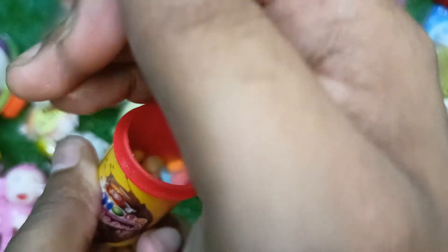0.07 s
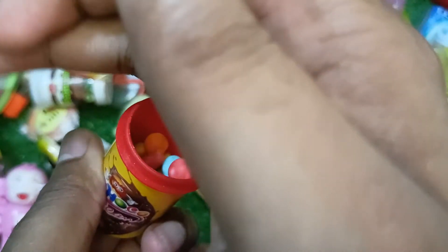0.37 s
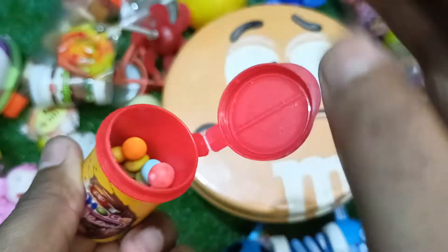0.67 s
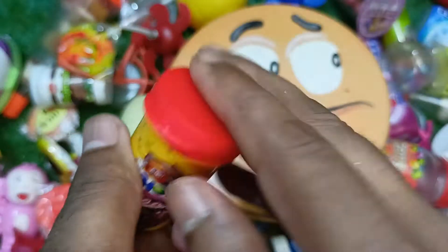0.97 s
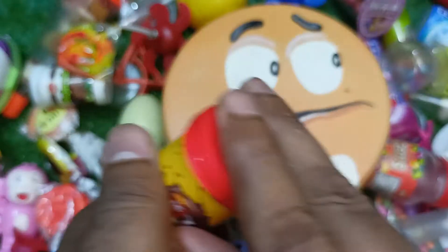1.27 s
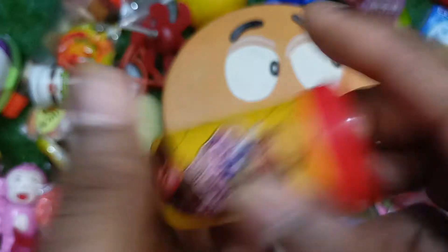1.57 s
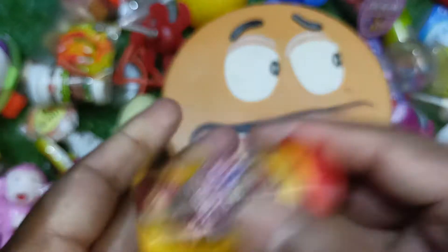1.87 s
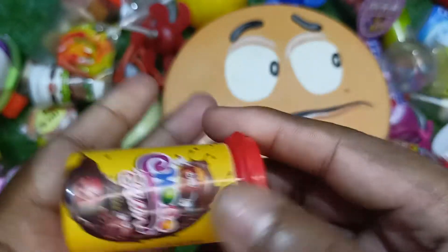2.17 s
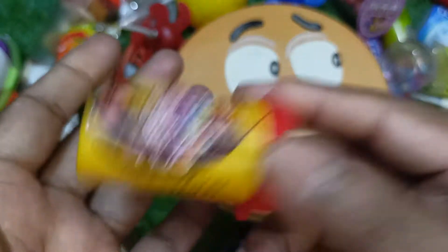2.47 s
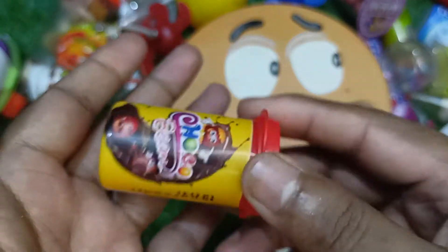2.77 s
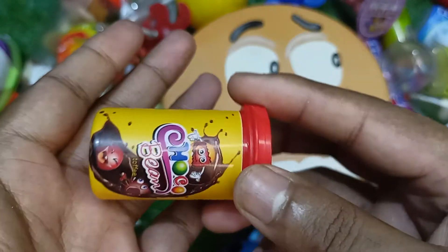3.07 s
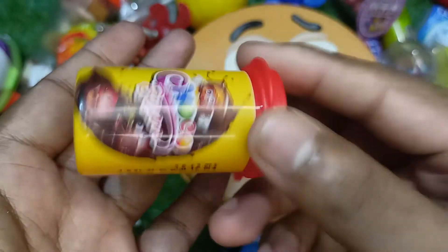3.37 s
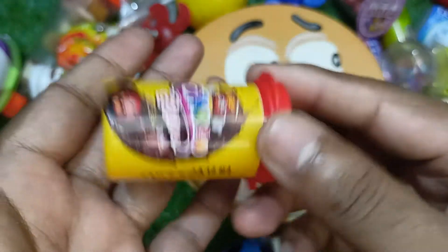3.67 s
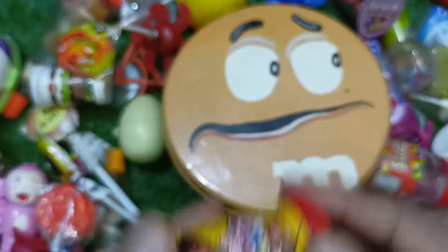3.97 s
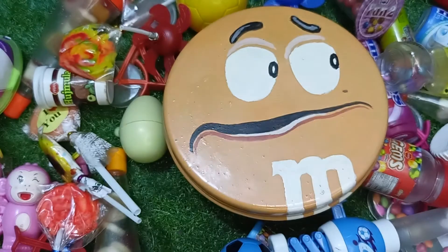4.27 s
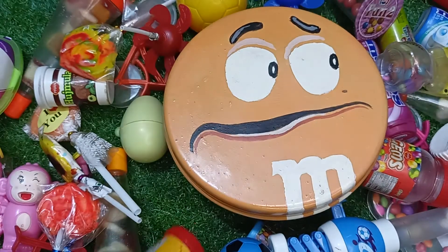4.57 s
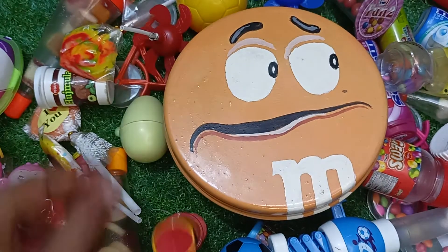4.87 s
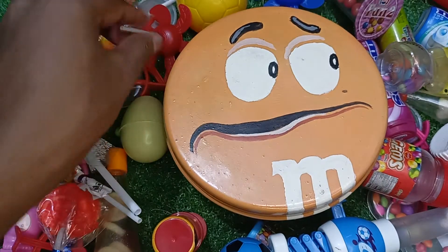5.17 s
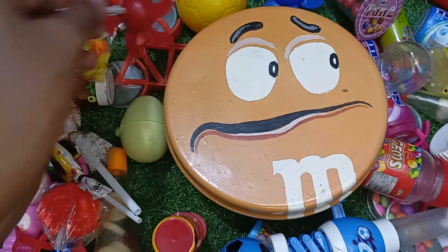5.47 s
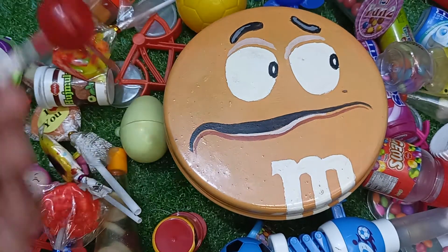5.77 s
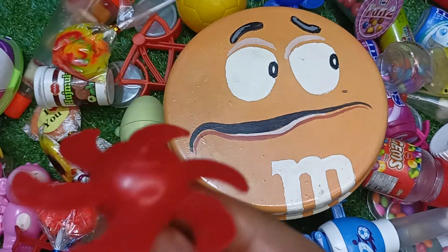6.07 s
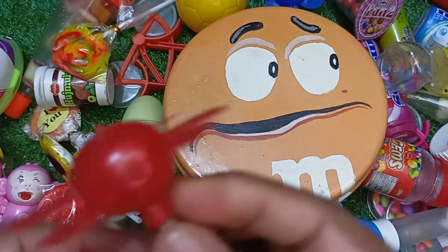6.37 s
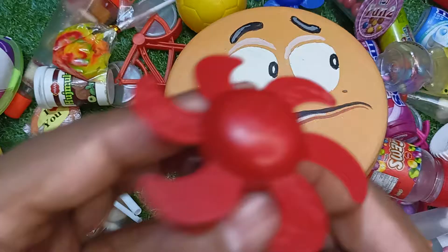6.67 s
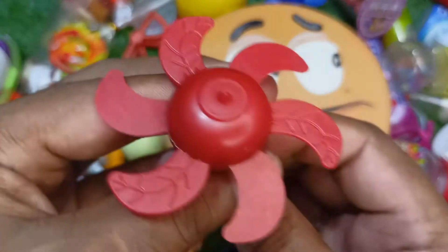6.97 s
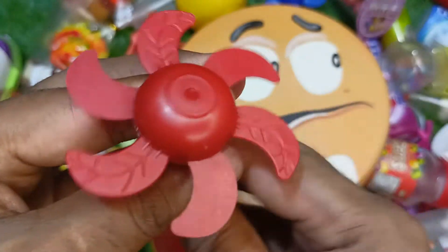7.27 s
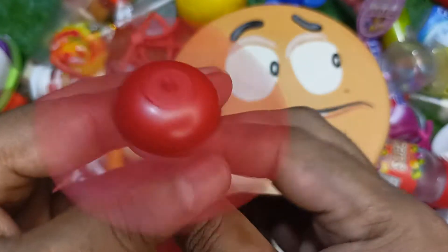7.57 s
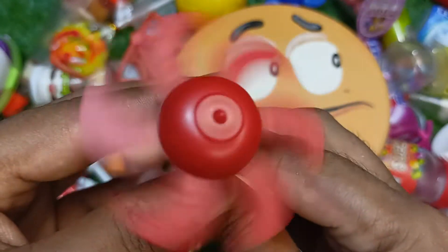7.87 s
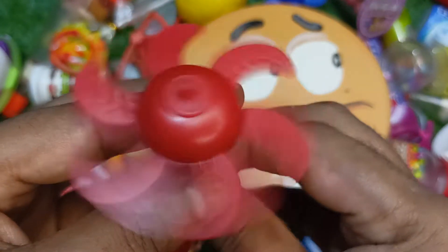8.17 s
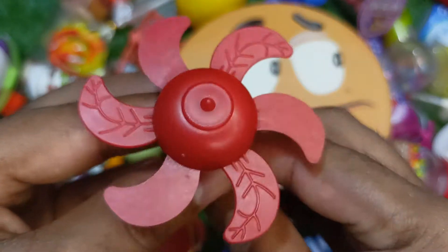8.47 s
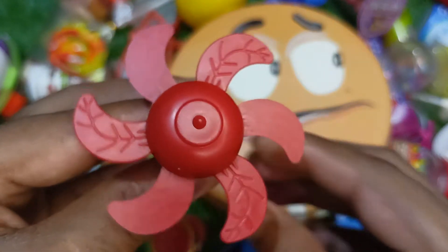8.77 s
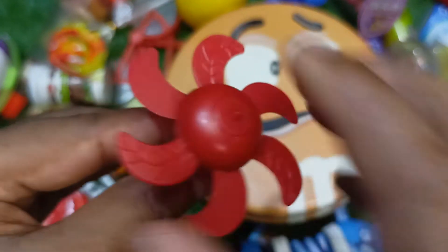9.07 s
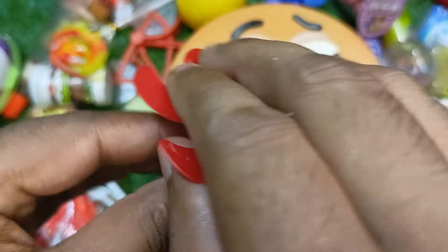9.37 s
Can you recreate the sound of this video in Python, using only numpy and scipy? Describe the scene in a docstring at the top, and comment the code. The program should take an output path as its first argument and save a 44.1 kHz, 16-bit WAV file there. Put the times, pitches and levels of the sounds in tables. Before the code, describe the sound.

In a small room with a fan humming softly, a plastic catch pops close to a phone microphone and a lid snaps sharply shut. Little candies then tumble and clack in a hollow plastic tube, mixed with low, muffled handling bumps. After a last soft rattle as the tube is put down come two light taps on a tin, then only the hum, a faint tick and a few soft bumps.

```python
"""Candies rattle in a small plastic tube, clacking together and ringing its hollow, close to a phone.
First the flip lid is thumbed open, its catch slipping and popping, and snapped shut.
Hands rub and bump the phone with dull thuds; the tube is set down and a toy knocks twice on a tin.
A fan hums throughout in the small room, and a limiter ducks around the snap."""
import sys
import numpy as np
from scipy import signal
from scipy.fft import rfft, irfft, next_fast_len
from scipy.io import wavfile
from scipy.ndimage import uniform_filter1d, minimum_filter1d, map_coordinates

SR = 44100
rng = np.random.default_rng(int(sys.argv[2]) if len(sys.argv) > 2 else 0)


def wrap_up_sound(samples):
    """Save the sound to the file named by the first command line argument, as 16-bit audio."""
    columns = np.atleast_2d(samples).T
    # keep every value between -1 and 1, then stretch to whole-number steps
    tamed = np.clip(columns, -1, 1)
    steps = np.round(tamed * 32767).astype(np.int16)
    wavfile.write(sys.argv[1], SR, steps)


N = 415422

# Each row: frequency in Hz, relative level in dB.
AIR_SPECTRUM = [(25, -68), (52, -4), (75, -12.5), (110, -5), (145, -8.5), (335, -10), (430, -15),
                (520, -10.5), (900, -17.5), (1800, -19.5), (2400, -23.5), (3900, -23.5), (6400, -28.5),
                (8200, -22), (10000, -35.5), (12500, -37), (15500, -30.5)]
# Each row: centre in Hz, level in dB, width in Hz.
MOTOR_LINES = [(111.4, -53, 9.4), (227.7, -60.5, 8), (343.9, -55.5, 20), (390, -59.5, 10), (502, -56.5, 22),
               (295.3, -60, 14)]
# Each row: time in seconds, level in dB.
WHINE_LEVELS = [(0, -61), (1.9, -62.5), (2.3, -60.5), (3.2, -58), (4.1, -60.5), (4.5, -66.5), (9.4, -64.5)]
# The catch slips and pops open; just after the snap, a candy jumps and ticks in the tube.
# Each row: start in seconds, length in seconds, strength in dB, lid ring in dB.
LID_CLICKS = [(0.128, .05, -19.5, -11), (0.2102, 0, -3.5, 11), (.226, 0, -17, -16), (.257, 0, -21, -18),
              (0.286, 0, -8.5, 9), (0.36, .018, -22.5, -6), (0.48, 0, -32, -12), (0.522, 0, -33, -6),
              (1.327, .019, -14.5, -4)]
# Tube rim and open lid. Each row: centre in Hz, width in Hz, relative level in dB.
RIM_MODES = [(1500, 520, -1), (3530, 1150, 0), (5300, 960, 0.5), (6250, 780, 1.5), (7900, 1800, 1),
             (11000, 2500, -11), (14600, 2300, -5)]
LID_MODES = [(3330, 500, -3), (3750, 600, 6), (4130, 650, 6)]
# Each row: start in seconds, strength in dB.
LID_SNAPS = [(1.2762, 6.5), (1.278, -2.5)]
# The closing tube. Each row: frequency in Hz, relative level in dB.
SNAP_SPECTRUM = [(150, -29), (350, -17), (600, -8), (1100, -8.5), (1600, -9), (2300, -19), (3600, -8),
                 (5000, -6), (6100, -8), (7200, -2), (8100, 4), (8900, -4), (9600, -16), (12000, -17),
                 (15000, -11)]
# Each row: centre time in seconds, level in dB, pitch in Hz.
HAND_BUMPS = [(1.075, -34, 90.5), (1.891, -22.5, 84), (1.954, -21, 90), (2.68, -21.5, 78.83),
              (3.004, -12.5, 114), (3.035, -25.5, 219), (3.306, -18, 170), (3.488, -19.5, 99.9),
              (3.8998, -15.5, 108), (3.9004, -15, 205), (4.46, -17.5, 140), (4.573, -12.5, 164),
              (8.501, -30, 98), (8.657, -36, 80), (9.24, -33, 101), (9.288, -40, 80)]
# Each row: start in seconds, length in seconds, relative level in dB.
FINGER_RUBS = [(1.55, .08, -39.5), (1.857, 0.2, -37), (2.541, 0.14, -32.5), (2.884, 0.13, -25.5),
               (3.05, 0.12, -33), (3.281, 0.067, -29), (3.44, 0.15, -28.5), (3.893, 0.045, -31.5),
               (4.3, 0.12, -37.5), (4.447, 0.19, -26), (4.69, 0.17, -30)]
# Each row: frequency in Hz, relative level in dB.
RUB_SPECTRUM = [(20, -38), (48, -8), (70, 2), (110, 2), (230, -14.5), (345, -30), (600, -65), (1000, -110)]
# Each row: start in seconds, length in seconds (0: one candy), strength in dB, relative brightness in dB.
CANDY_LANDINGS = [(1.7724, 0.003, -10.5, 11), (1.79, 0.0002, -15, 2), (1.8053, 0.023, -4.5, 6),
                  (1.8315, 0.018, -8.5, 3), (1.878, 0.00066, -12.5, 5), (1.9142, 0.014, -5, 4.5),
                  (1.9628, 0.02, -2, 5.5), (2.0555, 0.0046, -16, 8), (2.07, 0.011, -16.5, 5),
                  (2.081, .017, -8.5, 10), (2.1484, .004, -27.5, -3), (2.2137, .015, -25, 4.5),
                  (2.472, 0.0039, -25, -10), (2.4928, 0.024, -7, 7.5), (2.548, 0.0017, -26, 8),
                  (2.612, 0.0017, -15, 9), (2.617, 0.0085, -8.5, 3), (2.6538, 0.017, -1.5, 5),
                  (2.7436, 0.017, -12, 6), (2.768, 0.0018, -11, 5), (2.7753, .015, -6, 8),
                  (2.8171, 0, -21, 11), (2.8365, 0.00089, -25, 19), (2.8705, 0.00022, -23, 10),
                  (2.9733, 0, -34.5, 12), (3.508, 0.0048, -7.5, 9), (3.6493, 0.014, -19, 4),
                  (3.665, .01, -6, 5), (3.6823, 0.0032, -10.5, 2), (3.76, 0.016, -16, 5),
                  (3.784, .004, -20, 12), (3.8101, 0, -20.5, 1), (3.9514, 0.00054, -28, 1),
                  (4.6125, 0.0036, -29, 1), (4.6394, 0.017, -22, 5), (4.7609, .018, -18.5, 5),
                  (4.807, .004, -17.5, 7), (4.833, 0.029, -16, 2), (5.019, 0.0035, -26, 4)]
# Tube hollow and base. Each row: centre in Hz, width in Hz, relative level in dB.
TUBE_MODES = [(1400, 1100, -19), (2880, 440, 0), (3550, 700, 0), (5400, 1700, -1), (6350, 600, -8),
              (7950, 1600, 1.5), (8950, 700, -9), (11200, 2200, -13), (13900, 2400, -10), (15600, 1100, -7)]
BASE_MODES = [(560, 500, -3), (1219, 600, 2), (1516, 470, 1)]
# Each row: start in seconds, strength in dB.
TABLE_CONTACTS = [(4.7598, -26), (4.768, -37.5), (4.781, -42)]
# Each row: start in seconds, relative level in dB, low-pass corner (hardness) in Hz.
TIN_KNOCKS = [(5.386, -27, 2240), (5.4841, -19.5, 8000)]
# Each row: frequency in Hz, relative level in dB, T60 in seconds.
TIN_MODES = [(170, -20, .1), (285, -8, .085), (345, 2, .075), (405, -1, .13), (600, -9, .075),
             (705, -2, .1), (738, -7, .11), (1490, -12, .045), (1545, -3.5, .095), (2035, -9, .125),
             (2180, -18, .07), (2309, -27, .25), (3063, -17, .07), (3570, -3, .07), (3990, -10, .09),
             (4110, -10, .06), (4550, -12, .14), (4860, -14, .07), (5560, -13, .07), (6062, -13, .07),
             (7400, -13, .08), (8800, -16, .08), (10400, -18, .07), (15500, -13, .06)]
# Each row: start in seconds, strength in dB, centre in Hz.
TOY_TICKS = [(5.447, -31.5, 7460), (8.274, -28, 8550)]
# Each row: frequency in Hz, T60 in seconds.
ROOM_DECAY = [(200, 0.31), (1500, 0.36), (4000, 0.29), (8000, 0.3), (15000, 0.18)]


def amp(db):
    """dB to gain."""
    return 10 ** (np.asarray(db) / 20)


def unit_rms(x):
    """Scale to rms 1."""
    return x / np.sqrt(np.mean(x ** 2) + 1e-20)


def at_strength(sound, db):
    """Scale to a strength: the level of the energy packed into 1 ms."""
    return amp(db) * sound * np.sqrt(SR / 1000 / np.sum(sound ** 2))


def log_interp(points, hz):
    """Interpolate (Hz, value) points over log frequency."""
    knots_hz, values = np.transpose(points)
    return np.interp(np.log(hz + 1), np.log(knots_hz), values)


def add(track, start_s, sound):
    """Mix in place."""
    part = track[max(round(start_s * SR), 0):][:len(sound)]
    part += sound[:len(part)]


def filtered(x, response):
    """Zero-phase filter with gain response(hz)."""
    size = next_fast_len(len(x) + 8192)
    return irfft(rfft(x, size) * response(np.fft.rfftfreq(size, 1 / SR)), size)[:len(x)]


def high_pass(hz, corner_hz):
    """Gain falling 18 dB/octave below the corner."""
    ratio = (hz / corner_hz) ** 3
    return ratio / np.sqrt(1 + ratio ** 2)


def resonances(modes, hz):
    """Gain of broad modes, summed in power."""
    return np.sqrt(sum((amp(db) / (1 + (2 * (hz - centre_hz) / width_hz) ** 2)) ** 2
                       for centre_hz, width_hz, db in modes))


def body(response, size=1024):
    """Minimum-phase impulse response with gain response(hz)."""
    cepstrum = irfft(np.log(response(np.fft.rfftfreq(size, 1 / SR)) + 1e-6))
    cepstrum[1:size // 2] *= 2
    cepstrum[size // 2 + 1:] = 0
    return irfft(np.exp(rfft(cepstrum)))


def noise(response):
    """Coloured noise, rms 1."""
    return unit_rms(filtered(rng.standard_normal(N), response))


def tone(hz, drift_hz, knots_per_s=10):
    """Sine of wandering pitch, rms 1."""
    knots = rng.standard_normal(int(N * knots_per_s / SR) + 4)
    wander = map_coordinates(knots, [np.arange(N) * knots_per_s / SR])
    return np.sqrt(2) * np.sin(2 * np.pi * np.cumsum(hz + drift_hz * wander) / SR)


def contact(t60_s, scatter):
    """A sharp push, then waves scattering in a thin plastic wall."""
    t = np.arange(SR // 40) / SR
    force = scatter * rng.standard_normal(len(t)) * amp(-60 * t / t60_s)
    force[0] += 1
    return force


def cluster(length_s, contacts_per_s, spread_db, make_contact):
    """One contact at full level, then any others at uneven times and levels."""
    out = np.zeros(SR // 8)
    count = 1 + int(length_s * contacts_per_s)
    add(out, 0, make_contact())
    for k in range(1, count):
        start_s = length_s * (k + rng.uniform(-.5, .5)) / count
        add(out, start_s, amp(spread_db * (rng.normal() + 0.5)) * make_contact())
    return out


def strike(force, ring, db):
    """Ring a body with a force."""
    return at_strength(signal.fftconvolve(force, ring), db)


def fan(air_db=-44.5, blade_db=-48):
    """Steady air noise, fuzzy motor lines, a blade tone and a thin whine that comes and goes."""
    air = amp(air_db) * noise(lambda hz: amp(log_interp(AIR_SPECTRUM, hz)))
    hum = sum(amp(db) * noise(lambda hz: resonances([(centre_hz, width_hz, 0)], hz))
              for centre_hz, db, width_hz in MOTOR_LINES)
    blade = amp(blade_db) * tone(hz=297, drift_hz=1.48)
    whine_db = np.interp(np.arange(N) / SR, *np.transpose(WHINE_LEVELS))
    whine = amp(whine_db) * tone(hz=1482, drift_hz=15)
    return air + hum + blade + whine


def lid(contacts_per_s=75, spread_db=2):
    """The catch slips and pops open, ringing the lid; it snaps home, and a candy jumps and ticks."""
    out = np.zeros(N)
    for start_s, length_s, db, ring_db in LID_CLICKS:
        ring = body(lambda hz: resonances(RIM_MODES, hz) + amp(ring_db) * resonances(LID_MODES, hz))
        t60_s, scatter = (0.019, 0.1) if ring_db > 0 else (0.027, 0.57)  # clean pop or rough tick
        force = cluster(length_s, contacts_per_s, spread_db, lambda: contact(t60_s, scatter))
        add(out, start_s, strike(force, ring, db))
    closing_ring = body(lambda hz: amp(log_interp(SNAP_SPECTRUM, hz)))
    for start_s, db in LID_SNAPS:
        add(out, start_s, strike(contact(t60_s=0.023, scatter=0.72), closing_ring, db))
    return out


def hands(rub_db=-2, bump_width_cycles=0.41):
    """Bumps and rubs reach the microphone through the phone's case as bass only."""
    friction = amp(rub_db) * sum(rub_envelope(*row) for row in FINGER_RUBS)
    out = friction * noise(lambda hz: amp(log_interp(RUB_SPECTRUM, hz)))
    t = np.arange(-SR // 20, SR // 20) / SR
    for centre_s, db, hz in HAND_BUMPS:
        window = np.exp(-(hz * t / bump_width_cycles) ** 2 / 2)
        add(out, centre_s + t[0], -amp(db) * np.cos(2 * np.pi * hz * t) * window)
    return out


def rub_envelope(start_s, length_s, db, attack_s=0.017, sag_db_per_s=8, release_db_per_s=223):
    """A finger takes hold, eases off as it slides and lets go."""
    t = np.arange(N) / SR - start_s
    fade_db = sag_db_per_s * np.maximum(t, 0) + release_db_per_s * np.maximum(t - length_s, 0)
    return np.clip(1 + t / attack_s, 0, 1) * amp(db - fade_db)


def clack(bright_db, detune=.024, spot_db=3):
    """One contact; modes vary with the spot hit. Bright on another candy, hollow on the wall."""
    modes = [(centre_hz * (1 + detune * rng.normal()), width_hz, db + spot_db * rng.normal())
             for centre_hz, width_hz, db in TUBE_MODES]
    treble_shelf = lambda hz: amp((bright_db - 5.5) / (1 + np.exp((4400 - hz) / 300)))
    ring = body(lambda hz: resonances(modes, hz) * treble_shelf(hz))
    return strike(contact(t60_s=0.014, scatter=0.16), ring, db=0)


def tumble(length_s, db, bright_db, contacts_per_s=480, spread_db=3):
    """The heap lands as clacks that share its strength."""
    return at_strength(cluster(length_s, contacts_per_s, spread_db, lambda: clack(bright_db)), db)


def candies(lead_s=.008, lead_db=-16, bounces=3, flight_s=0.0075, bounce_db=-15, loss_db=12):
    """Each landing: a loose candy ahead, the main tumble, then ever softer bounces."""
    out = np.zeros(N)
    for start_s, length_s, db, bright_db in CANDY_LANDINGS:
        jitter = 1 + .25 * rng.uniform(-1, 1, bounces + 1)
        add(out, start_s - lead_s * jitter[0], tumble(0, db + lead_db, bright_db))
        add(out, start_s, tumble(length_s, db, bright_db))
        for k, delay_s in enumerate(flight_s * np.cumsum(jitter[1:])):
            add(out, start_s + length_s + delay_s, tumble(0, db + bounce_db - loss_db * k, bright_db))
    return out


def rolling(blows, relative_db=-16, settle_s=0.0049, bumps_per_s=200):
    """After each blow the candies roll along the wall; soft bumps ring the hollow."""
    smoothing = 1 / (settle_s * SR + 1)
    agitation = np.sqrt(np.abs(signal.lfilter([smoothing], [1, smoothing - 1], blows ** 2)))
    bumps = (rng.random(N) < bumps_per_s / SR) * rng.standard_normal(N)
    hollow = body(lambda hz: resonances([(3050, 220, -1), (3900, 1100, 0)], hz))
    return amp(relative_db) * agitation * unit_rms(signal.fftconvolve(bumps, hollow)[:N])


def set_down():
    """The tube's base lands on the table and rings."""
    out = np.zeros(N)
    ring = body(lambda hz: resonances(BASE_MODES, hz))
    for start_s, db in TABLE_CONTACTS:
        add(out, start_s, strike(contact(t60_s=0.016, scatter=0.18), ring, db))
    return out


def tin_knocks(crack_t60_s=.055, crack_low_hz=2500, crack_high_hz=10000):
    """The toy hits the tin: a crack and ringing modes, the harder the brighter."""
    out = np.zeros(N)
    t = np.arange(SR // 2) / SR
    crack_band = lambda hz: high_pass(hz, crack_low_hz) / np.sqrt(1 + (hz / crack_high_hz) ** 4)
    for start_s, db, corner_hz in TIN_KNOCKS:
        ring = np.zeros(len(t))
        for mode_hz, mode_db, t60_s in TIN_MODES:
            decay = amp(mode_db + rng.normal() - 60 * t / t60_s)
            phase_cycles = (mode_hz > 1000) * rng.random()
            ring += decay * np.sin(2 * np.pi * (mode_hz * t + phase_cycles))
        crack = amp(-60 * t / crack_t60_s) * filtered(rng.standard_normal(len(t)), crack_band)
        blow = body(lambda hz: high_pass(hz, 186) / np.sqrt(1 + (hz / corner_hz) ** 2), size=4096)
        add(out, start_s, amp(db) * signal.fftconvolve(ring + crack, blow))
    return out


def toy_ticks():
    """The plastic toy ticks in the fingers."""
    out = np.zeros(N)
    for start_s, db, centre_hz in TOY_TICKS:
        ring = body(lambda hz: resonances([(centre_hz, 3500, 0), (14500, 4000, -5)], hz))
        add(out, start_s, strike(contact(t60_s=0.011, scatter=0.345), ring, db))
    return out


def room(send, wet_db=-10, delay_s=.007, block_samples=8192):
    """Small-room tail, redrawn each block as the hands move about."""
    out = np.zeros(N)
    for start in range(0, N, block_samples):
        block = send[start:start + block_samples]
        if block.any():
            hz, t, spectrum = signal.stft(rng.standard_normal(SR // 2), SR, nperseg=256)
            decay = amp(-60 * t / log_interp(ROOM_DECAY, hz)[:, None])
            tail = signal.istft(spectrum * decay, SR, nperseg=256)[1]
            add(out, start / SR + delay_s, signal.fftconvolve(block, tail / np.linalg.norm(tail)))
    return amp(wet_db) * out


def scene(rattle_send_db=-3, lid_send_db=-1.5, toy_send_db=1):
    """Mono mix; cupped hands shield the rattle from the walls."""
    blows = candies() + set_down()
    rattle = blows + rolling(blows)
    clicks = lid()
    toy = tin_knocks() + toy_ticks()
    reverb = room(amp(rattle_send_db) * rattle + amp(lid_send_db) * clicks + amp(toy_send_db) * toy)
    return (rattle + clicks + toy + reverb + hands() + fan())[None]


def record(dry, ceiling=.88, window_s=.018, release_db_per_s=130, low_hz=36, top_hz=15850):
    """A limiter ducks just ahead of a peak and recovers slowly; then a band limit."""
    window = int(window_s * SR)
    excess_db = 20 * np.log10(np.maximum(np.abs(dry[0]) / ceiling, 1))
    recovery_db = release_db_per_s * np.arange(N) / SR
    held_db = np.maximum.accumulate(excess_db + recovery_db) - recovery_db
    gain = amp(uniform_filter1d(minimum_filter1d(-held_db, window), window))
    band = lambda hz: high_pass(hz, low_hz) / np.sqrt(1 + (hz / top_hz) ** 240)
    return filtered(dry[0] * gain, band)[None]


dry = scene()
out = record(dry)
wrap_up_sound(out)
```